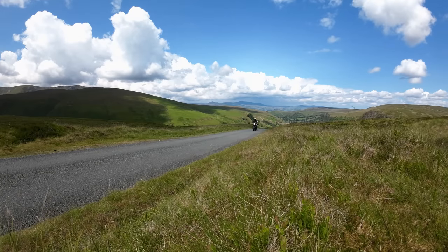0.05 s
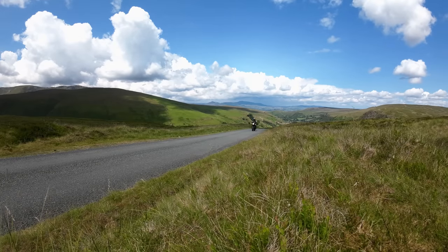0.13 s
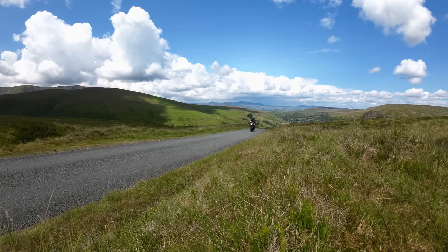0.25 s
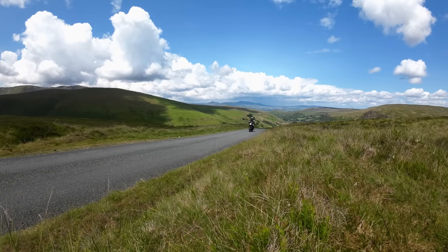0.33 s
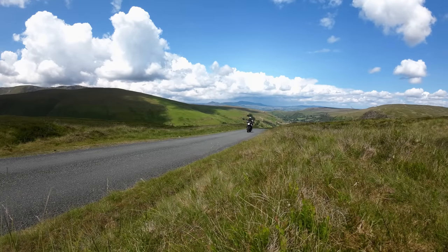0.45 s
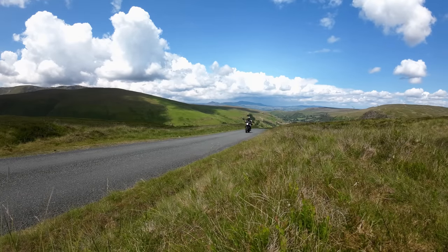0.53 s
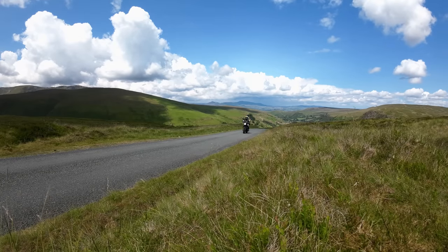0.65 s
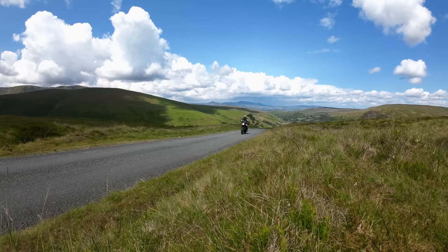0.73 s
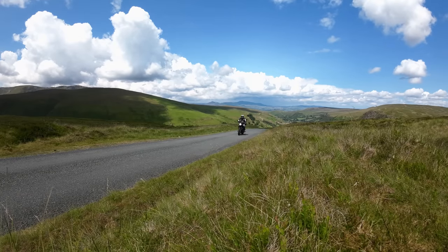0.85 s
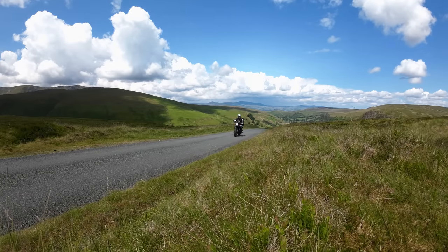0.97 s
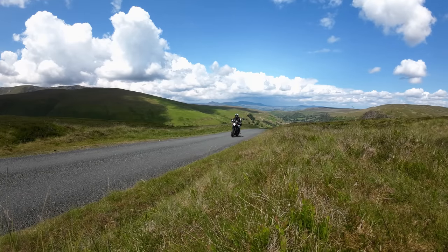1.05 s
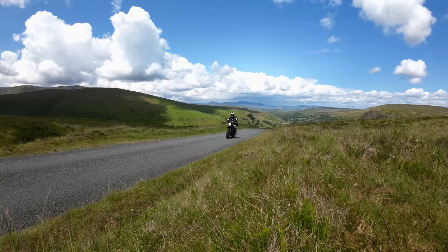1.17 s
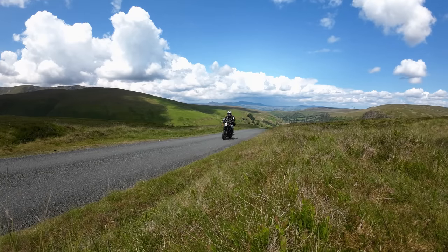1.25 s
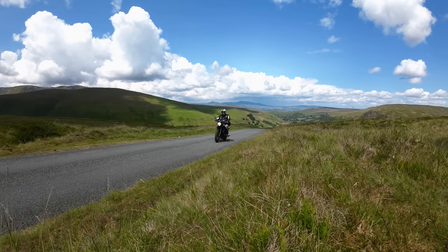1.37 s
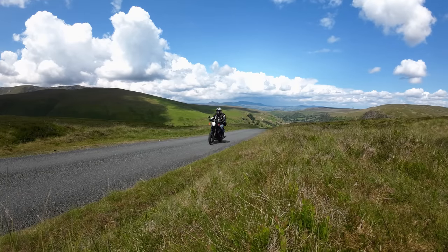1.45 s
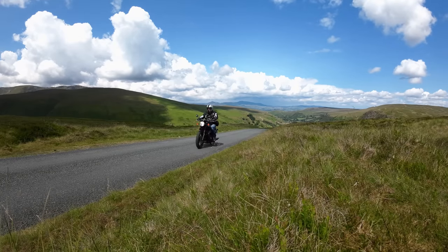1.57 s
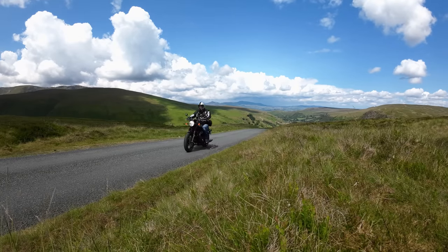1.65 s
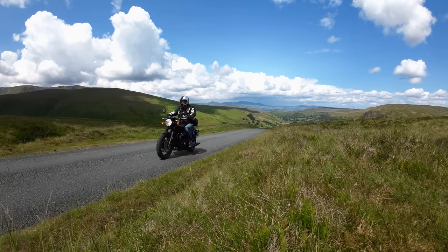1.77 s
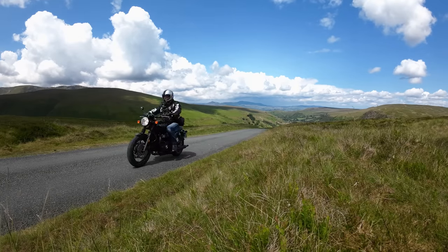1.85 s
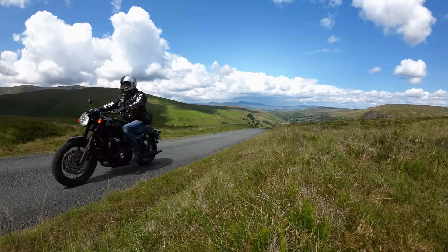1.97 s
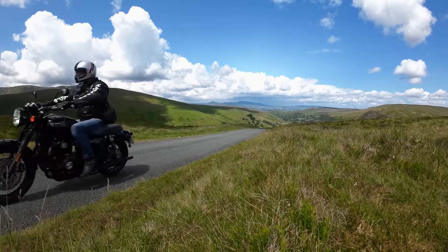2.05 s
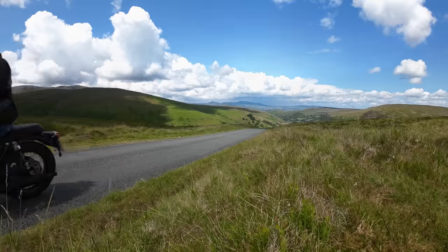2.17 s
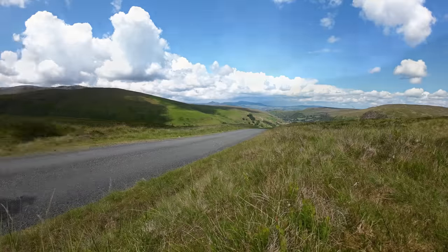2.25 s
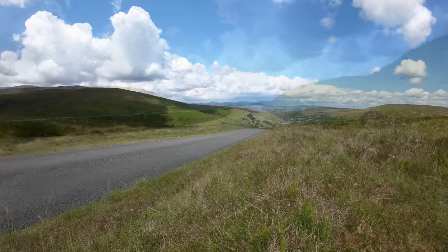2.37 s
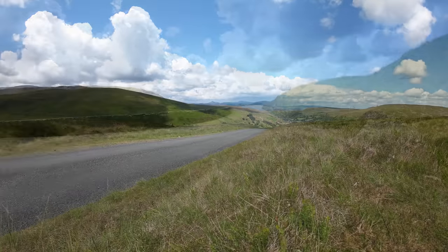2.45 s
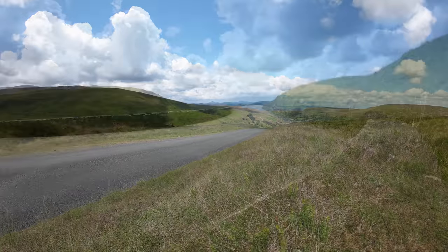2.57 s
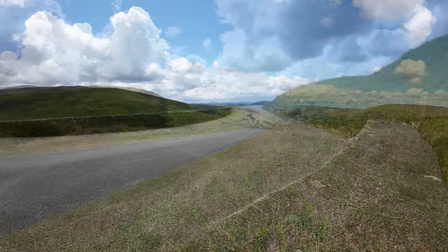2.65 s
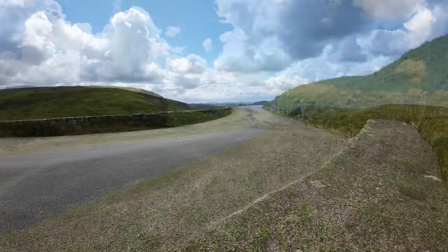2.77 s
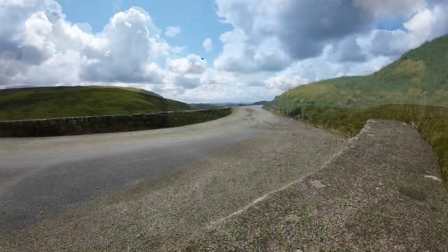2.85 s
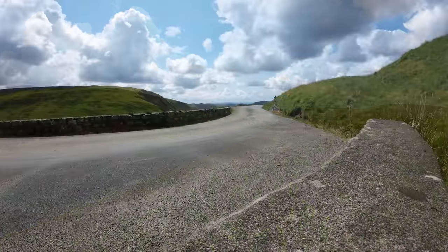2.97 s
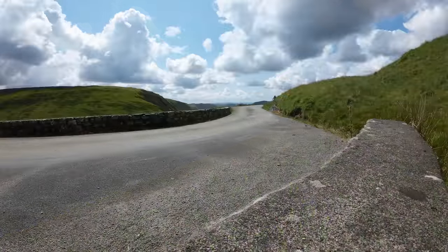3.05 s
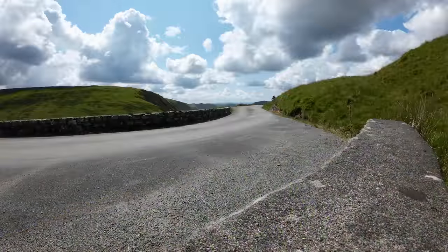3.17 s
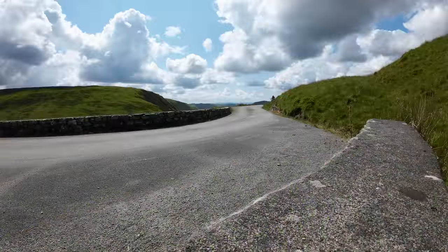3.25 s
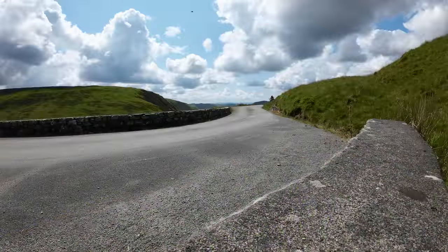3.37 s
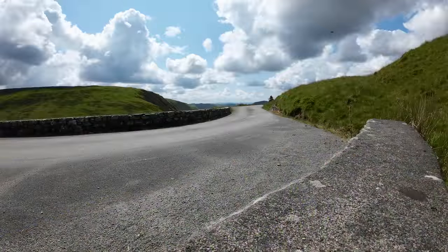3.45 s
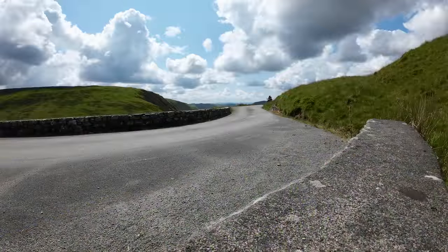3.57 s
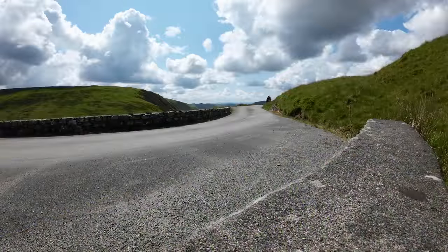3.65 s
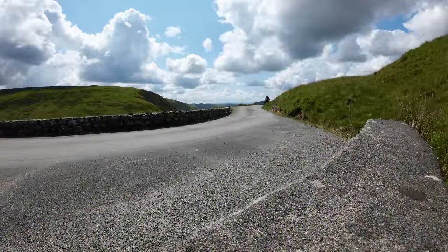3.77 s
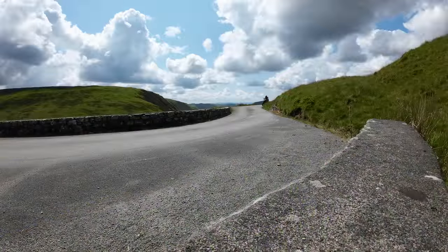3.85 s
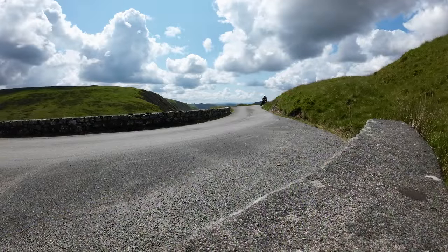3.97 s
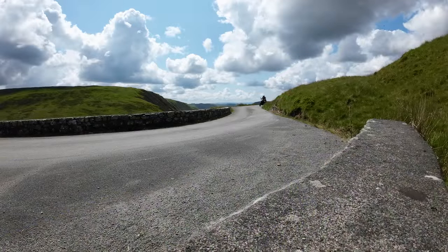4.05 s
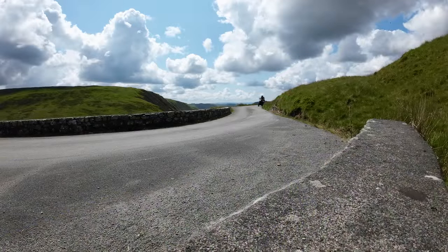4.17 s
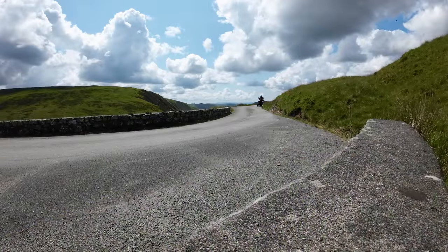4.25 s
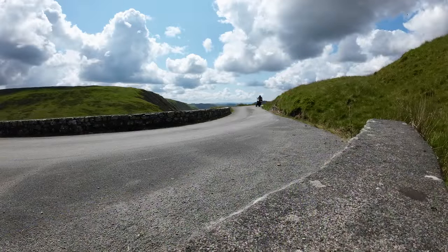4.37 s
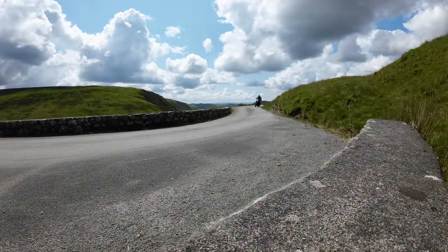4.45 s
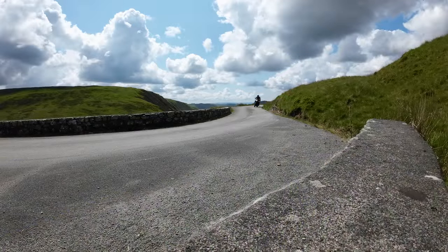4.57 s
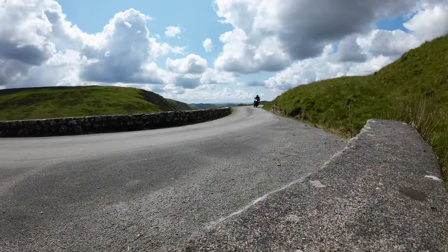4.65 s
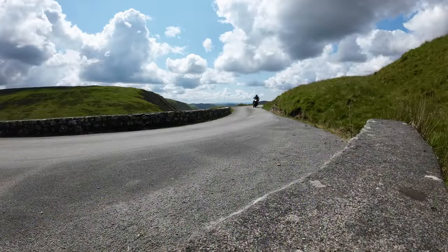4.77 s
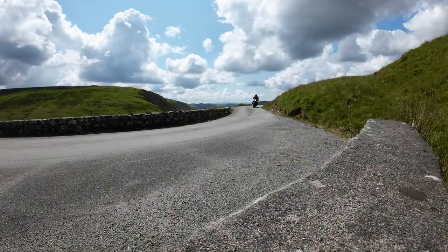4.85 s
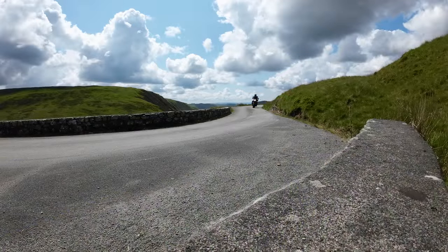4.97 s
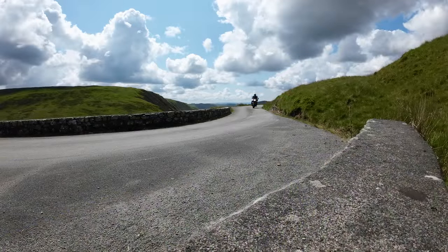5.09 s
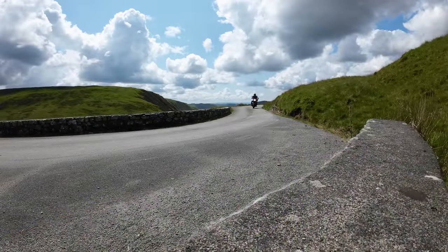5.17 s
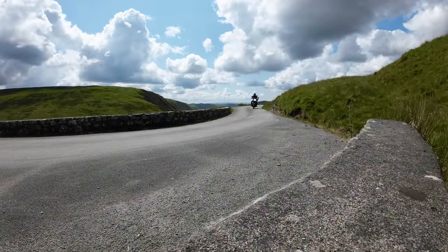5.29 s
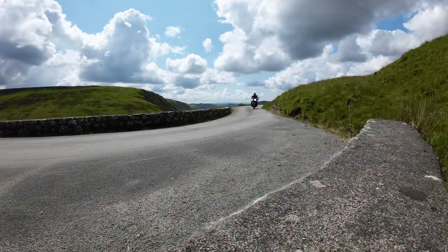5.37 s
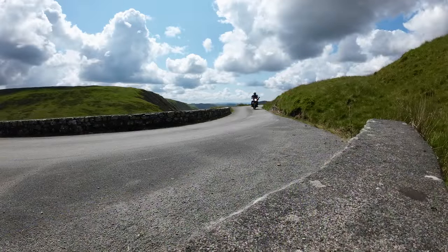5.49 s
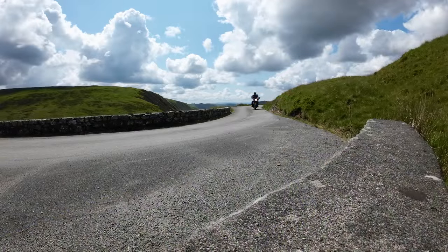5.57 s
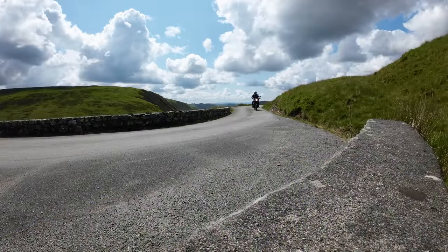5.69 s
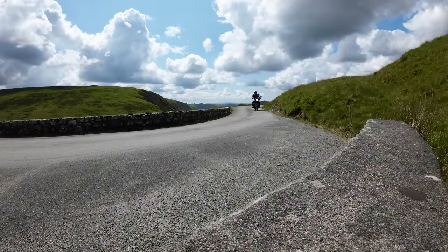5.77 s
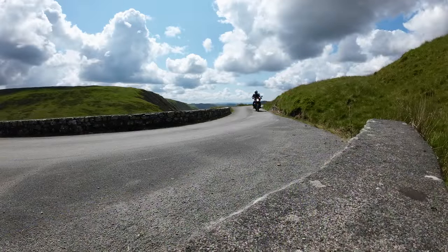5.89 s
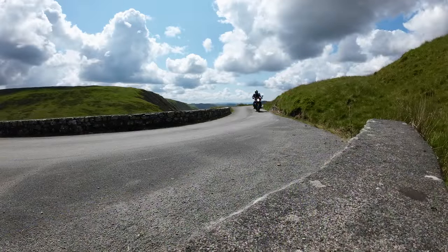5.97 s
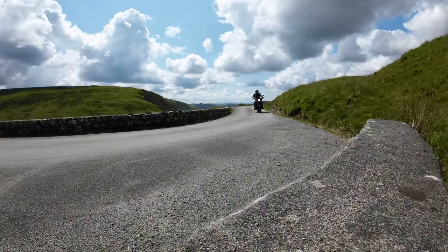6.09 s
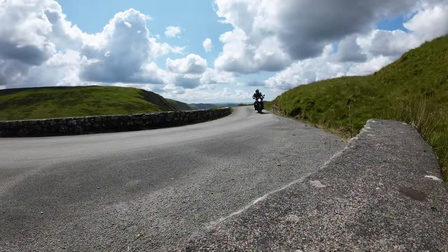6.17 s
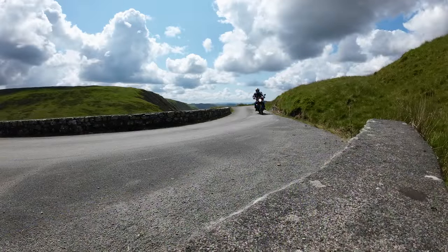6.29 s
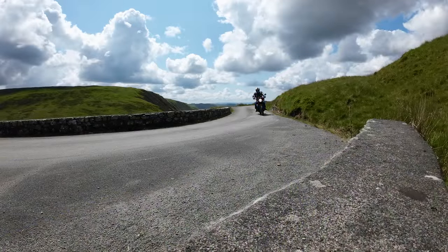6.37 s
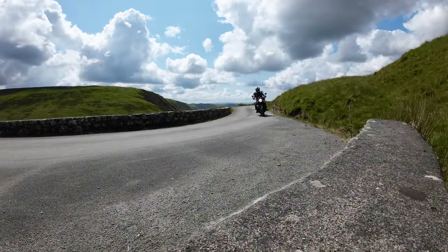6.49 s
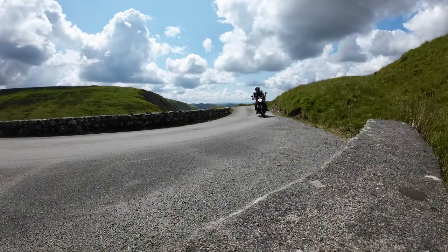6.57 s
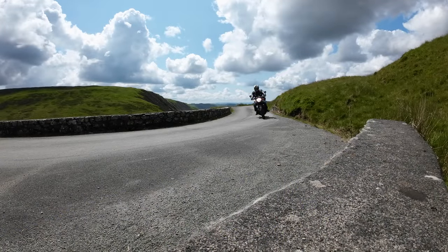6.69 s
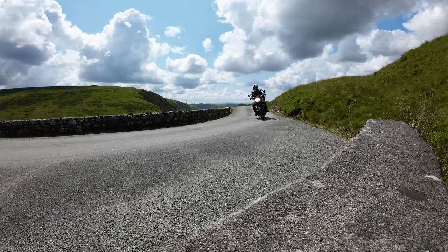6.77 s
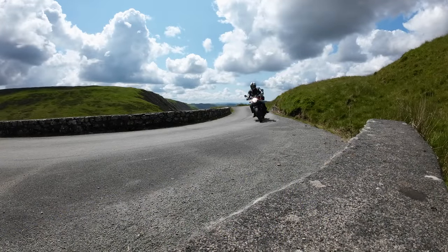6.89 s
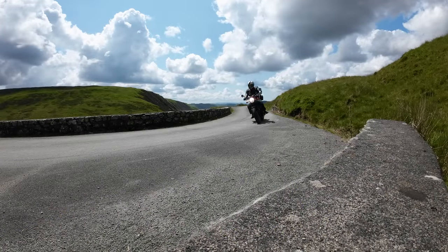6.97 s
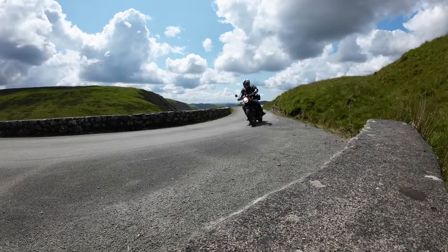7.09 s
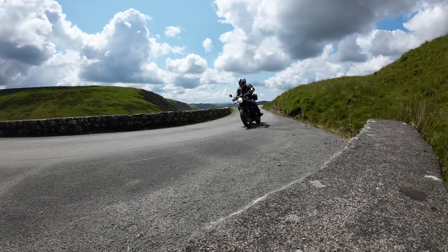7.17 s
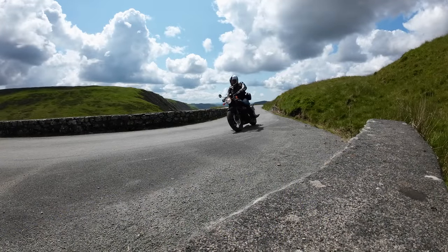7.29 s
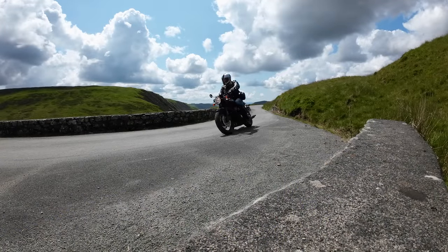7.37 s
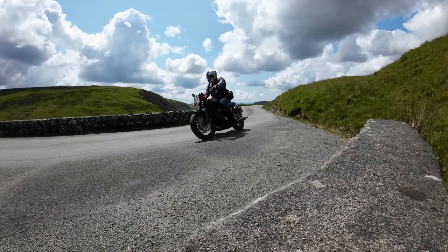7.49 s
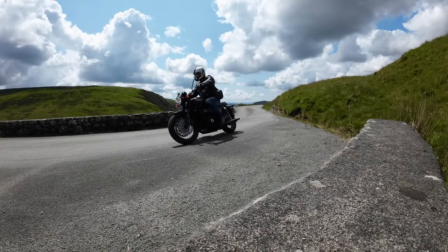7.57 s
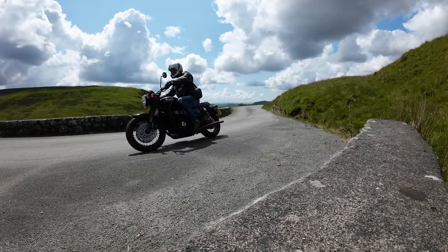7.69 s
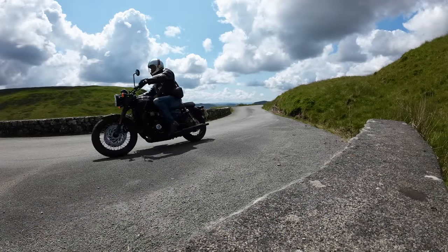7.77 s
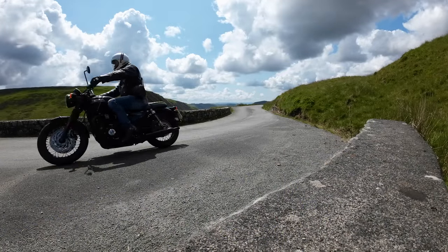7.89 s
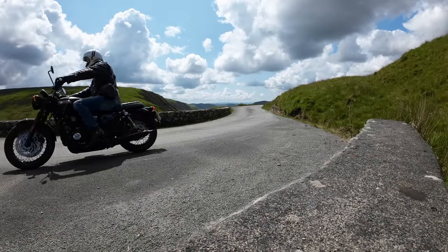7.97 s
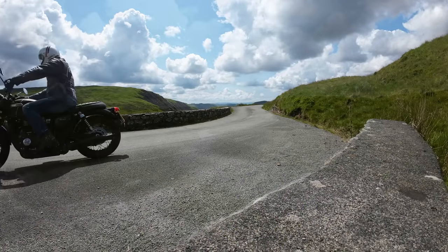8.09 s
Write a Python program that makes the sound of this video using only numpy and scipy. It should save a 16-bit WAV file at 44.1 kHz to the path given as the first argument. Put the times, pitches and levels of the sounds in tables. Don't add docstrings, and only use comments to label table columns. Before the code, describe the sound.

On an open moorland road, a twin-cylinder motorcycle with an uneven, throaty beat approaches at steady revs, swells into a loud close pass, and drops in pitch as it leaves. A crossfade brings a second, distant approach: the engine pulls upward, then the throttle shuts with irregular pops. It slows into a bend, rattling nearer, with grit cracks and tiny brake squeaks. A small fixed roadside microphone hears it dry, over dull, very quiet air.

```python
import sys
import numpy as np
from scipy import signal
from scipy.fft import rfft, irfft, next_fast_len
from scipy.io import wavfile
from scipy.ndimage import uniform_filter1d

SR = 44100
rng = np.random.default_rng(int(sys.argv[2]) if len(sys.argv) > 2 else 0)


def gain_from_db(level_db):
    decades = np.asarray(level_db, float) / 20
    return 10 ** decades


def int16_out(signal):
    q = np.round(np.clip(np.atleast_2d(signal).T, -1, 1) * 32767)
    wavfile.write(sys.argv[1], SR, q.astype(np.int16))


N = 358974
TIME = np.arange(N) / SR
SIZE = next_fast_len(N)
FREQ = np.fft.rfftfreq(SIZE, 1 / SR)
MAX_CYCLES = 260

# [from_s, to_s, treble_db, low_end_db]
TURNS = [(1.897, 2.2, -5, 1.5), (4.5, 4.802, -3.5, 10)]
# [pitch_hz, width_hz, share_0_to_1]
VALLEYS = [(207, 30, .6), (183, 45, .75)]


def columns(table):
    s, *rest = np.transpose(table)
    return [np.interp(TIME, s, column) for column in rest]


def ramp(start_s, end_s):
    return np.clip((TIME - start_s) / (end_s - start_s), 0, 1)


def stages(table):
    s, *rest = np.transpose(table)
    rises = np.array([ramp(at, at + 0.24) for at in s[1:]])
    return [column[0] + np.diff(column) @ rises for column in rest]


def unit(x, weight=1.):
    return x / np.sqrt(np.mean(weight * x ** 2) / np.mean(weight))


def ring(x, hz, q):
    return signal.lfilter(*signal.iirpeak(hz, q, SR), x)


def strain(x, order, hz, kind="low"):
    return signal.sosfilt(signal.butter(order, hz, kind, fs=SR, output="sos"), x)


def tilt(x, low_hz, high_hz, db, low_db, high_db, hold_s):
    spectrum = rfft(x, SIZE)
    low, below = (irfft(spectrum / (1 + (FREQ / hz) ** 6), SIZE)[:N] for hz in (low_hz, high_hz))
    parts = np.array([low, below - low, x - below])
    slow = uniform_filter1d(parts ** 2, int(hold_s * SR), axis=1)
    levels_db = db + np.array([low_db, 0 * db, high_db])
    return np.sum(parts / np.sqrt(slow + 1e-18) * gain_from_db(levels_db), axis=0)


def walk(rate):
    k = int(SR / rate)
    steps = np.repeat(rng.standard_normal(N // k + 1), k)
    return unit(uniform_filter1d(uniform_filter1d(steps, k), k)[:N])


def firings(cycles, timing, size):
    at = np.interp(np.arange(len(size)) + timing, cycles, np.arange(N), right=N)
    return np.bincount(at.astype(int), size, N + 1)[:N]


def air():
    return gain_from_db(-72.0) * unit(strain(rng.standard_normal(N), 2, 300))


def pipes(cycles, modes, scatter_db, pop_share, early, edge_db):
    chance = rng.random((MAX_CYCLES, 2, 2))
    pop = (chance[:, :, 0] < pop_share) * chance[:, :, 1]
    size = gain_from_db(scatter_db * (rng.standard_normal((MAX_CYCLES, 2)) + pop))
    puff = np.exp(-(np.arange(-100, 101) / SR / 0.00075) ** 2)
    out = 0
    for timing, second_db, hz, width, db, polarity in modes[::-1]:
        first = firings(cycles, timing - early * pop[:, 0], size[:, 0])
        second = firings(cycles, timing + 3 / 8 - early * pop[:, 1], size[:, 1])
        clicks = first + gain_from_db(second_db) * second
        out = out + np.sign(polarity) * gain_from_db(db) * ring(clicks, hz, hz / width)
    out = signal.fftconvolve(out, puff, "same")
    out = signal.sosfiltfilt(signal.butter(3, 310, fs=SR, output="sos"), out)
    openings = first + second
    tail_pipe = ((300, 8.5), (430, -5.5), (660, -23))  # pitch_hz, level_db
    edge = sum(gain_from_db(db) * ring(ring(openings, hz, 3), hz, 3.5) for hz, db in tail_pipe)
    return unit(out) + gain_from_db(edge_db) * unit(edge)


def intake(cycles, timing, upper_db):
    # [pitch_hz, width_hz, level_db]
    airbox = [(228, 50, 1), (320, 111, -1), (457, 38, -15.5)]
    lead = .11
    gulps = sum(firings(cycles, timing - lead + late, np.ones(MAX_CYCLES)) for late in (0, 3 / 8))
    rings = []
    for hz, width, db in airbox:
        rings.append(gain_from_db(db) * ring(ring(gulps, hz, hz / width), hz, hz / width))
    box = strain(rings[0] - rings[1], 6, 365)
    return unit(box + gain_from_db(upper_db) * rings[2])


def exhaust(cycles, voices, db, thump_db, bark_db, rush_db, gulp_db, upper_db, valley):
    rises = [ramp(voice[1], voice[2]) for voice in voices] + [0]
    out = 0
    for k, (modes, _, _, *rough) in enumerate(voices):
        share = rises[k] - rises[k + 1]
        out = out + share * unit(pipes(cycles, modes, *rough), share)
    throttle = 1 - rises[1]
    hz, width, swallowed = valley
    out = out - throttle * min(swallowed, 1) * ring(out, hz, hz / width)
    timing = voices[0][0][0][0]
    out = out + throttle * gain_from_db(gulp_db) * intake(cycles, timing, upper_db)
    rush = strain(rng.standard_normal(N), 4, [45, 190], "band")
    out = out + unit(rush) * gain_from_db(rush_db + 1.7 * walk(2.49))
    return tilt(out, 57.8, 210.4, db, thump_db, bark_db, 0.22)


def cases(cycles, bands_db, spectrum, throb_db, tick_db):
    # [pitch_hz, width_hz, boost_db]
    fins = [(788, 15, 4.5), (1320, 290, 6), (1680, 80, 1.5), (2003, 33, 5), (2360, 200, -3),
            (2450, 140, 1.5), (3957, 69, 4.5), (4680, 170, -2.5), (5500, 91, 5), (6020, 120, 3),
            (6570, 130, 3.5), (7780, 140, 0.5), (8900, 140, 3), (11300, 430, 4)]
    hz, colour_db = np.transpose(spectrum)
    colour_db = np.interp(np.log(FREQ + 1), np.log(hz), colour_db, left=-90)
    for fin_hz, width, boost_db in fins:
        colour_db = colour_db + boost_db / (1 + (2 * (FREQ - fin_hz) / width) ** 2)
    throb = np.cos(2 * np.pi * (cycles - .4)) + .5 * np.cos(6 * np.pi * (cycles - .4))
    rattle = rng.standard_normal(N) * gain_from_db(throb_db * throb + 2.3 * walk(9))
    taps = 0
    for timing in (.37, .75):
        taps = taps + firings(cycles, timing, gain_from_db(4.0 * rng.standard_normal(MAX_CYCLES)))
    decay = np.exp(-np.arange(400) / SR / 0.0033)
    ticks = signal.fftconvolve(taps, decay)[:N] * rng.standard_normal(N)
    ticks = strain(ticks, 2, 6500, "high")
    struck = unit(rattle) + gain_from_db(tick_db) * unit(ticks)
    body = irfft(rfft(struck, SIZE) * gain_from_db(colour_db), SIZE)[:N]
    return tilt(body, 973, 3980, *bands_db, 0.13)


def gears(cycles, db, coarse_db, teeth_table):
    out_s, furthest_s, in_s = 5.7, 5.9, 5.94
    clutch = ramp(out_s, furthest_s) - ramp(furthest_s, in_s)
    shaft = np.cumsum(np.gradient(cycles) * (1 - .07 * clutch))
    coarse_db = coarse_db - 20 * clutch
    lines = 0
    for teeth, gear_db, blur in teeth_table:
        level_db = gear_db + coarse_db * (teeth < 70) + 2.64 * walk(45)
        phase = 2 * np.pi * teeth * shaft + min(blur, 2.5) * walk(40 * blur)
        lines = lines + gain_from_db(level_db) * np.sin(phase)
    return gain_from_db(db + 2 * np.cos(2 * np.pi * (cycles - .4))) * lines


def motorcycle(speed, levels, steps, voices, rattle, teeth, turn, valley, rush_db, gulp_db, upper_db,
               throb_db, tick_db, bark_db_per_hz, bark_from_hz, low_db, low_per_db, top_db, top_per_db):
    hz = columns(speed)[0]
    cycles = np.cumsum(hz) / SR
    pipes_db, cases_db = columns(levels)
    thump_db, bark_db, whine_db, coarse_db = stages(steps)
    bark_db = bark_db + bark_db_per_hz * (hz - bark_from_hz)
    upper_db = upper_db + 2.5 * (hz - bark_from_hz)
    nearness_db = cases_db + 45.5
    from_s, to_s, turn_top_db, turn_low_db = turn
    turned = ramp(from_s, to_s)
    low_db = low_db + low_per_db * nearness_db + turn_low_db * turned
    top_db = top_db + top_per_db * nearness_db + turn_top_db * turned
    return (exhaust(cycles, voices, pipes_db, thump_db, bark_db, rush_db, gulp_db, upper_db, valley)
            + cases(cycles, (cases_db, low_db, top_db), rattle, throb_db, tick_db)
            + gears(cycles, cases_db + whine_db, coarse_db, teeth))


def first_pass():
    # [time_s, cycles_per_s]
    speed = [(0.0, 29.916), (1.02, 29.794), (1.82, 28.85), (1.96, 25.4), (2.04, 26.75), (2.14, 26.3),
             (2.58, 19.08), (2.84, 16.493), (3.2, 13.855)]
    # [time_s, pipes_db, cases_and_tyres_db]
    levels = [
        (0, -26, -53.5),
        (.5, -25, -48),
        (1.05, -25.5, -45),
        (1.77, -18, -36.5),
        (1.89, -10.5, -34.5),
        (2.15, -9, -32),
        (2.49, -12, -42),
        (2.57, -18, -46),
        (3.1, -33, -65),
    ]
    # [from_s, thump_over_pipes_db, bark_over_pipes_db, whine_over_cases_db, coarse_gears_db]
    steps = [(0, -9.5, -12.5, -10, 2), (.9, -11.5, -15.5, -8, -7), (1.7, -14, -15.5, 0, -10.5),
             (2.1, -15, -19, -5.5, -5), (2.4, -1.5, -22, -1.5, -10), (2.65, -2, -24, 5.5, -14)]
    # [valve_timing_cycles, second_cylinder_db, pitch_hz, width_hz, level_db, polarity]
    cruise = [(0.173, 7.5, 61, 87.5, -2, -1.0), (0.173, 4, 158.7, 80.5, 1.03, 1.0),
              (0.173, -2.5, 244, 22.0, -5, -1.0), (0.642, 8.5, 46.4, 203, -16, -1.0),
              (0.642, 4.5, 184.8, 20, 1, 1.0), (0.642, 21, 264.3, 22.6, -26.5, 1.0)]
    passing = [(0.097, -0.5, 52.6, 30.2, 4.5, 1.0), (0.097, -2, 110.7, 21.8, 6, 1.0),
               (0.097, 3.1, 146.4, 89.6, -8, -1.0), (0.203, 3.5, 69, 72.6, -3, -1.0),
               (0.203, 3.5, 113.0, 31.0, 1.5, 1.0), (0.203, -2.5, 202, 72, -12.5, 1.0)]
    # pipes, fade_from_s, fade_to_s, scatter_db, pop_share_0_to_1, early_cycles, valve_edge_db
    voices = [(cruise, -2, -1, .6, 0, 0, -38),
              (passing, 1.81, 1.86, 1.0, .12, .06, -34)]
    # [pitch_hz, level_db_per_hz]
    rattle = [(290, 1), (500, -2.5), (648, -0.5), (1140, -5), (1350, -3.5), (1540, -5), (2020, -5.5),
              (2180, -7), (3990, -7), (4670, -12), (6600, -14.5), (11800, -28.5), (15700, -38)]
    # [teeth_per_cycle, level_db, backlash_blur_rad]
    teeth = [(18, -3, .3), (22, -3, .4), (27, -6, .4), (44, -8, 1.5), (54, -8, 1.2), (66, -9, 1.2),
             (92, -3, 10), (100, -2, 1.2)]
    return motorcycle(speed, levels, steps, voices, rattle, teeth, TURNS[0], VALLEYS[0],
                      rush_db=-21, gulp_db=-30, upper_db=3, throb_db=0.8, tick_db=-25,
                      bark_db_per_hz=1.5, bark_from_hz=28.2,
                      low_db=-6, low_per_db=-.45, top_db=-3.5, top_per_db=-0.1064)


def grit():
    # [time_s, peak_db]
    stones = [(1.1717, -50), (5.4694, -47.5), (5.5483, -48), (7.418, -41.5), (7.6454, -46), (7.709, -30),
              (7.898, -34), (7.946, -33), (8.0142, -40), (8.0401, -35), (8.0554, -38)]
    s, db = np.transpose(stones)
    hits = np.bincount((s * SR).astype(int), gain_from_db(db), N)
    decay = np.exp(-np.arange(500) / SR / 0.0011)
    cracks = signal.fftconvolve(hits, decay)[:N] * rng.standard_normal(N)
    return strain(cracks, 2, 4000, "high")


def second_pass():
    # [time_s, cycles_per_s]
    speed = [(2.55, 19.406), (3.21, 15.951), (3.63, 12.495), (4.37, 16.103), (4.9, 18.065), (5.56, 19.656),
             (7.61, 15.223), (7.68, 15.225), (8.14, 11.058)]
    # [time_s, pipes_db, cases_and_tyres_db]
    levels = [
        (3.2, -30.5, -69.5),
        (3.8, -30.5, -68),
        (4.33, -30, -53.5),
        (5.6, -28, -50.5),
        (6.19, -24.5, -50),
        (6.96, -28.5, -46.5),
        (7.15, -24.5, -46),
        (7.75, -21, -39),
        (8.14, -17.5, -39),
    ]
    # [from_s, thump_over_pipes_db, bark_over_pipes_db, whine_over_cases_db, coarse_gears_db]
    steps = [(0, -25, -18, -12, -8), (4.0, -22, -15.5, -4, 1), (5.4, -13, -14, -1, 0.5),
             (6.6, -6, -5.5, -4, 2), (7.5, -8, -14.5, 1, -13), (7.8, -9, -15, -3, -14)]
    # [valve_timing_cycles, second_cylinder_db, pitch_hz, width_hz, level_db, polarity]
    climb = [(.251, 3.8, 57.6, 219, -6.5, -1), (.251, 1, 126.6, 22.8, -1.5, 1),
             (.251, 4.5, 208.4, 62, -9, 1), (.333, 4.3, 64.5, 22, -5.5, 1), (.333, 1.3, 105, 31.8, -0.5, 1),
             (.333, 0.65, 258, 70, -20.5, -1)]
    overrun = [(0.418, 1.5, 62.5, 59.4, 0.5, 1.0), (0.418, -2.5, 138.5, 40, 2, -1.0),
               (0.418, -0.5, 255.5, 23.6, -9, 1.0), (0.932, 9.5, 57, 101.3, -14.5, -1.0),
               (0.932, 7.5, 109.0, 40.0, -9.5, 1.0), (0.932, 5, 192, 21.95, -10, 1.0)]
    bend = [(0.428, -0.47, 69, 82, -1.5, 1.0), (0.428, -0.32, 106.5, 23, 7.5, 1.0),
            (0.428, -0.51, 154.5, 47.7, -0.2, -1.0), (0.629, 0.43, 48, 22.0, -43, -1.0),
            (0.629, 0.6, 100.0, 42.0, 4, -1.0), (0.629, 0.16, 220.5, 72.0, -3.5, 1.0)]
    # pipes, fade_from_s, fade_to_s, scatter_db, pop_share_0_to_1, early_cycles, valve_edge_db
    voices = [(climb, -2, -1, .5, 0, 0, -25),
              (overrun, 5.72, 5.77, 2.4, .3, .07, -22),
              (bend, 6.7, 7.25, 2.8, .2, .05, -29)]
    # [pitch_hz, level_db_per_hz]
    rattle = [(290, 1), (500, -3), (793, -5.5), (943, -8), (1040, -4), (1390, -8), (1830, -4.5), (2180, -9),
              (2590, -7), (2820, -10.5), (3350, -11), (6600, -21.5), (15700, -43.5)]
    # [teeth_per_cycle, level_db, backlash_blur_rad]
    teeth = [(44, 0, 1.3), (67, -3, 1.9), (88, -10, 1.3), (100, 0, 1.3), (200, -11, 2.8)]
    return motorcycle(speed, levels, steps, voices, rattle, teeth, TURNS[1], VALLEYS[1],
                      rush_db=-27, gulp_db=-11.5, upper_db=5.5, throb_db=0.62, tick_db=-6.5,
                      bark_db_per_hz=2, bark_from_hz=18.77,
                      low_db=-12, low_per_db=-.72, top_db=-5, top_per_db=0.25)


def squeaks():
    # [time_s, peak_db, pitch_hz, length_ms]
    brake_rings = [(7.870, -29, 12350, 20), (7.873, -42, 14400, 12), (7.948, -50, 10300, 6.7),
                   (7.950, -51, 11700, 12), (8.078, -45, 8200, 8), (8.087, -43, 9500, 10),
                   (8.090, -49, 12500, 22), (8.092, -39, 11300, 10), (8.102, -43, 10700, 35),
                   (7.29, -51, 9100, 11.2), (7.78, -46, 6450, 12), (7.9, -38, 3100, 3),
                   (7.902, -40, 1900, 4), (8.09, -45, 4250, 30), (3.19, -54, 906, 8),
                   (3.479, -51, 1030, 11), (3.508, -46, 1070, 4.7), (3.559, -46.5, 804, 6.5)]
    out = np.zeros(N + SR)
    t = np.arange(-700, 700) / SR
    waver = 1 + 0.33 * np.sin(2 * np.pi * 330 * t)
    for s, db, hz, ms in brake_rings:
        swell = np.cos(np.pi * np.clip(t * 1000 / ms, -.5, .5)) ** 2
        at = int(s * SR) - 700
        out[at:at + len(t)] += gain_from_db(db) * swell * waver * np.sin(2 * np.pi * hz * t)
    return out[:N]


def scene():
    first = first_pass() * (1 - ramp(3.04, 3.17))
    second = second_pass() * ramp(1.9, 2.7)
    return (first + second + squeaks() + grit() + air())[None]


def band_limit(x):
    return signal.sosfilt(signal.butter(12, 15830, fs=SR, output="sos"), x)


def record(dry):
    heard = strain(dry, 2, 27, "high")
    heard = heard / (1 + np.abs(heard / 1.05) ** 6) ** (1 / 6)
    return band_limit(heard)


dry = scene()
out = record(dry)
int16_out(out)
```